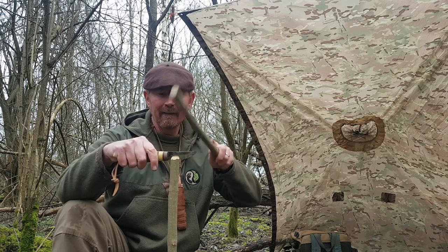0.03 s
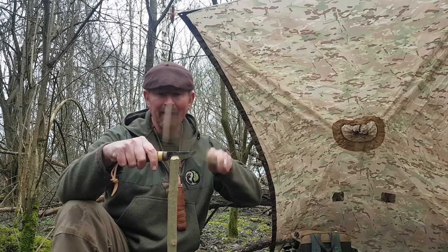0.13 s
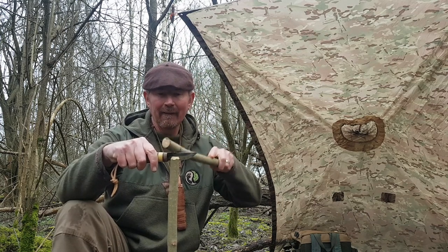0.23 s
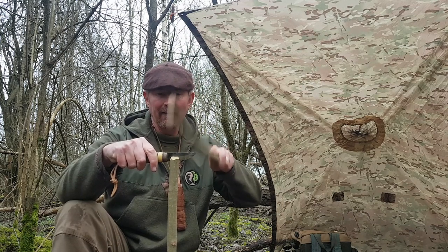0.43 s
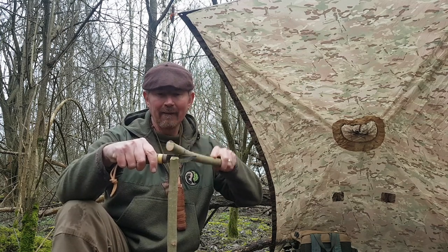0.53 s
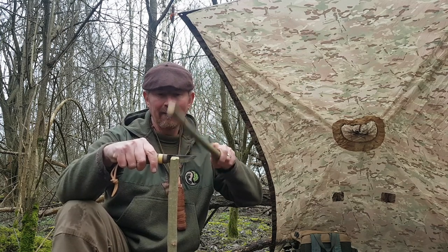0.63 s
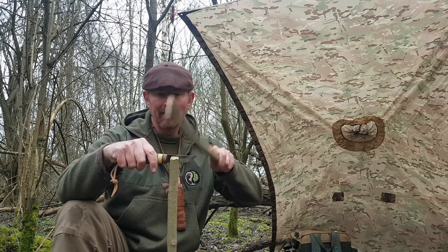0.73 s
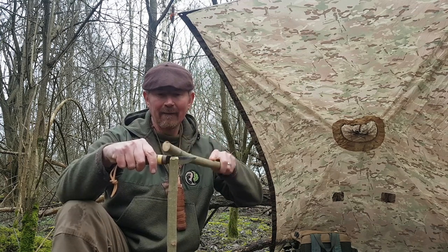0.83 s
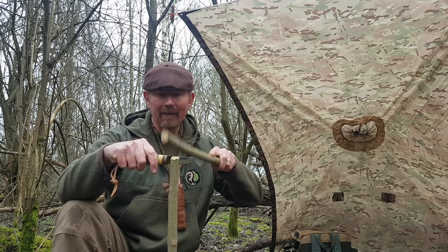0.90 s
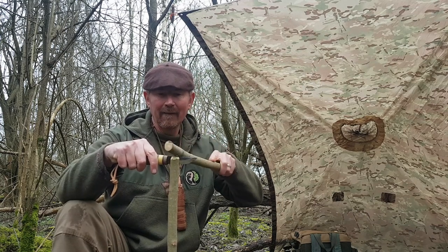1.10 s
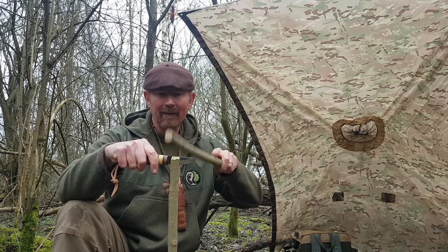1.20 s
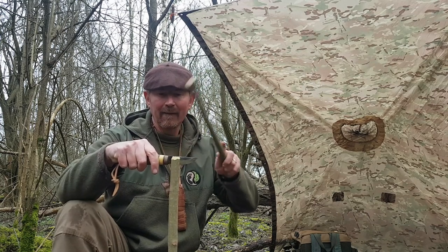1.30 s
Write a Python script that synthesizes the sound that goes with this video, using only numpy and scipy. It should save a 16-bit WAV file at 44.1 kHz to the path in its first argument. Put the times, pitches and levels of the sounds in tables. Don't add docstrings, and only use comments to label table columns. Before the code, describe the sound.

A wooden baton strikes a knife blade into a stake at about 0.2, 0.5, 0.8 and 1.15 seconds. Each blow is a light touch instantly followed by a hard, short wood-and-steel crack, with a low soil thump and brief woodland reflections. The first is brightest, the third loudest and duller. Cloth and twigs tick near 0.1 and 0.9; faint birds whistle near 0.4, 0.6 and 1.3 over distant traffic hum and hiss.

```python
import sys
import numpy as np
from scipy import signal
from scipy.io import wavfile
from scipy.ndimage import uniform_filter1d

SR = 44100
rng = np.random.default_rng(int(sys.argv[2]) if len(sys.argv) > 2 else 0)


def waveform_to_disk(signal):
    frames = np.transpose(np.atleast_2d(signal))
    scaled = np.clip(frames, -1, 1) * 32767
    samples = np.round(scaled).astype(np.int16)
    wavfile.write(sys.argv[1], SR, samples)


def boost_factor(decibels):
    exponent = np.asarray(decibels, float) / 20
    return 10 ** exponent


N = 59535
CONTACT_S = 0.0004


def evened(x):
    return x / np.sqrt(np.mean(x ** 2) + 1e-20)


def read(points, hz):
    f, value = np.transpose(points)
    return np.interp(np.log(hz + 1), np.log(f + 1), value)


def add(mix, start_s, sound):
    part = mix[:, round(start_s * SR):][:, :sound.shape[1]]
    part += sound[:, :part.shape[1]]


def coloured(x, points):
    hz = abs(np.fft.fftfreq(4096, 1 / SR))
    log_gain = np.log(boost_factor(read(points, hz)))
    minimum_phase = np.exp(np.conj(signal.hilbert(log_gain)))
    taps = np.fft.ifft(minimum_phase).real[:2048]
    return signal.fftconvolve(x, taps[None], axes=1)[:, :x.shape[1]]


def pair(x, right_db):
    lag = 4
    late = np.r_[np.zeros(lag), x[:-lag]]
    return np.array([x, boost_factor(right_db) * late])


# pitch_hz, level_db (per Hz)
HUM_COLOUR = [(22, -38), (45, -33.5), (85, 2), (360, -16), (800, -12.5), (1400, -25), (3000, -34),
              (7500, -56)]
# pitch_hz, likeness (-1 to 1)
HUM_LIKENESS = [(60, .98), (180, .94), (400, .7), (700, .1), (1400, -.22), (3000, .01)]
# pitch_hz, left_minus_right_db
HUM_LEAN = [(60, -0.5), (180, -0.5), (550, 1.5), (1650, 4.5), (4970, 5.5), (15000, 0.5)]


def hum():
    hum_db, patch_db, air_edge_hz = -45, 0.98, 15800
    frames, hz = N // 256 + 5, np.fft.rfftfreq(1024, 1 / SR)
    a, b, c, d, patches = rng.standard_normal((frames, 513, 5)).T
    patches = uniform_filter1d(patches, 10, 0)
    patches = evened(uniform_filter1d(patches, 12, 1))
    same = np.clip(read(HUM_LIKENESS, hz), -1, 1)[:, None]
    left = a + 1j * b
    right = same * left + np.sqrt(1 - same ** 2) * (c + 1j * d)
    half_lean_db = read(HUM_LEAN, hz)[:, None] / 2
    level_db = read(HUM_COLOUR, hz)[:, None] + patch_db * patches
    z = np.array([left, right]) * boost_factor(level_db + np.array([half_lean_db, -half_lean_db]))
    z *= (hz < air_edge_hz)[:, None]
    sound = signal.istft(z, nperseg=1024, noverlap=768)[1][:, :N]
    return boost_factor(hum_db) * evened(sound)


# time_s, pitch_hz, level_db
BIRD_CALLS = [
    [(.39, 3500, -71), (.43, 3900, -68), (.46, 4150, -69), (.49, 3880, -71), (.515, 3750, -75)],
    [(.58, 4280, -82), (.68, 4480, -77), (.80, 4420, -83)],
    [(1.24, 3720, -75), (1.30, 3740, -70), (1.40, 3720, -71)],
]


def birds():
    flutter_db, fade_s = 1.2, 0.013
    out, t = np.zeros(N), np.arange(N) / SR
    for time_s, pitch_hz, level_db in map(np.transpose, BIRD_CALLS):
        fade = np.clip(np.minimum(t - time_s[0], time_s[-1] - t) / fade_s, 0, 1)
        flutter = evened(uniform_filter1d(rng.standard_normal(N), 500))
        level = fade * boost_factor(np.interp(t, time_s, level_db) + flutter_db * flutter)
        glide_hz = uniform_filter1d(np.interp(t, time_s, pitch_hz), size=900)
        out += level * np.sin(2 * np.pi * np.cumsum(glide_hz) / SR)
    return 2 * out


# start_s, level_db, pitch_hz (centre), t60_s (time to die by 60 dB), left_minus_right_db
TICK_EVENTS = [(.086, -38, 4810, 0.0355, 9.5), (0.088, -47, 2620, 0.042, 5),
               (0.094, -44.5, 5240, 0.028, 25), (0.087, -67, 12800, 0.079, 6), (.468, -65, 14300, .015, 25),
               (.905, -48, 6000, 0.023, 17.5), (.905, -52, 12900, 0.012, 12),
               (0.9247, -41.5, 5300, 0.02, 16), (0.9225, -47.5, 2900, .02, 3),
               (0.922, -42, 13900, 0.023, 15), (1.008, -59.5, 6000, .015, 14)]


def ticks():
    width = 0.22
    out, t = np.zeros((2, N)), np.arange(2500) / SR
    for start_s, level_db, pitch_hz, t60_s, lean_db in TICK_EVENTS:
        edges = np.clip([pitch_hz * (1 - width), pitch_hz * (1 + width)], 100, 20000)
        band_filter = signal.butter(2, edges, "band", fs=SR)
        band = signal.lfilter(*band_filter, rng.standard_normal(len(t)))
        add(out, start_s, pair(evened(band) * boost_factor(level_db - 60 * t / t60_s), -lean_db))
    return out


# pitch_hz, t60_s
TRUNK_DECAY = [(100, 0.1), (1000, .4), (3000, 0.49), (6000, 0.36), (9000, 0.085), (15000, 0.1)]


def trunks(x):
    taps = np.zeros((2, 30000))
    at = np.arange(400, 29980, 20) + rng.integers(0, 20, (2, 1479))
    np.put_along_axis(taps, at, rng.choice([-1., 1.], at.shape), 1)
    hz, t, z = signal.stft(taps, SR, nperseg=256)
    decay = boost_factor(-60 * t / read(TRUNK_DECAY, hz)[:, None])
    tail = signal.istft(z * decay, SR, nperseg=256)[1]
    return signal.fftconvolve(x[None], tail / np.linalg.norm(tail[0]), axes=1)[:, :N]


# delay_s, left_db, right_db
NEAR_ECHOES = [(.0045, -17, -11), (.0100, -16.5, -25), (0.0166, -30.5, -26), (0.022, -32, -31.5)]


def echoes(wood):
    spread_s = 0.006
    out, size = np.zeros((2, N)), round(spread_s * SR)
    heard = np.array([wood[0], wood.mean(0)])
    for delay_s, left_db, right_db in NEAR_ECHOES:
        smear = rng.standard_normal((2, size)) * np.hanning(size)
        smear *= boost_factor([[left_db], [right_db]]) / np.linalg.norm(smear, axis=1, keepdims=True)
        add(out, delay_s, signal.fftconvolve(heard, smear, axes=1))
    return out


def ground(push_db, thump_db):
    push_hz, push_t60_s = 240.6, 0.012
    thump_hz, thump_sag, thump_rise_s, thump_after_s = 83.6, 0.44, 0.0085, 0.0016
    right_lag = 10
    t = np.arange(5000) / SR
    push = -boost_factor(push_db - 60 * t / push_t60_s) * np.sin(2 * np.pi * push_hz * t)
    u = np.maximum(t - thump_after_s, 0) / thump_rise_s
    pitch_hz = thump_hz * (1 + thump_sag * np.exp(-u)) * (u > 0)
    turns = np.cumsum(pitch_hz) / SR
    thump = boost_factor(thump_db) * u * np.exp(1 - u) * np.sin(2 * np.pi * turns)
    swing = push + thump
    return np.array([swing, np.roll(swing, right_lag)])


# pitch_hz, level_db
CRACK_COLOUR = [(300, -12), (1500, -21), (6000, -3), (7700, -7.5), (9000, -12), (11500, -5.5), (14500, -4),
                (16800, -15.5)]


def snap(level_db, air_db):
    crack_db, crack_t60_s, crack_right_db = -2, 0.006, -23
    sizzle_db, sizzle_t60_s, sizzle_right_db = -44.5, 0.36, -17
    ring_hz, ring_t60_s, ring_db, ring_right_db = 6075, 0.0072, 2.5, -38.5
    t = np.arange(9000) / SR
    noise = rng.standard_normal((3, len(t)))
    crack = pair(noise[0] * boost_factor(crack_db - 60 * t / crack_t60_s), crack_right_db)
    sizzle = noise[1:] * boost_factor(sizzle_db - 60 * t / sizzle_t60_s) * boost_factor([[0], [sizzle_right_db]])
    air = boost_factor(air_db) * coloured(crack + sizzle, CRACK_COLOUR)
    ring = boost_factor(ring_db - 60 * t / ring_t60_s) * np.sin(2 * np.pi * ring_hz * t)
    ring *= 1 - np.exp(-t / CONTACT_S)
    return boost_factor(level_db) * (air + pair(ring, ring_right_db))


# pitch_hz, level_db, t60_s, left_minus_right_db, touch_db (change when only touched)
RING_MODES = [(515, -15, .018, 0, -3.2), (927, -4, 0.012, 5, -8.5), (1214, -9.5, 0.018, 6, 11.7),
              (1500, -21.5, 0.01, 22, 17), (1738, -6.5, 0.014, 33.5, -5.5), (1993, 3, 0.017, 7.5, 0),
              (2407, -14, 0.022, 12.5, -20.7), (2879, 1.5, 0.01, 2, -7.5), (3128, 0, 0.033, 15, -1),
              (3443, -10.5, 0.03, 4.5, -28), (3874, -5.5, 0.019, 5.5, -13.7), (4213, -2, 0.015, 38.5, 5),
              (5380, -1.5, 0.0073, 15.5, -10.5), (7530, -15.5, 0.0072, 14.5, 13)]
SHADE_PITCHES = [600, 1200, 2000, 3100, 5300]


def contact(level_db, bright_db, touch, shade):
    bright_hz, detune = 4000, 0.002
    touch_damping = 2.5
    chatter_s, chatter_db = 0.003, -27
    t = np.arange(7000) / SR
    luck = rng.standard_normal((len(RING_MODES), 2))
    noise = rng.standard_normal(len(t))
    shade_table = np.c_[SHADE_PITCHES, shade]
    ring = np.zeros((2, len(t)))
    for (pitch_hz, mode_db, t60_s, lean_db, touch_db), (side, drift) in zip(RING_MODES, luck):
        mode_db = mode_db + touch * touch_db + read(shade_table, pitch_hz)
        mode_db += bright_db * np.log2(pitch_hz / bright_hz + 1)
        decay = boost_factor(mode_db - 60 * t / t60_s * touch_damping ** touch)
        wave = np.sin(2 * np.pi * pitch_hz * (1 + detune * drift) * t) * np.sign(side)
        ring += pair(decay * wave, -lean_db)
    ring *= 1 - np.exp(-t / CONTACT_S)
    click = t == 0
    chatter = boost_factor(chatter_db) * noise * np.clip(2 - 2 * t / chatter_s, 0, 1) + click
    return boost_factor(level_db - 6) * signal.fftconvolve(ring, chatter[None], axes=1)[:, :len(t)]


# start_s (touch), touch_db, knock_after_s, knock_db, brightness_db
BLOW_EVENTS = [
    (0.2129, -10, 0.0018, -12.5, 6.5),
    (0.519, -15.5, .0030, -7.5, 4),
    (.8300, -10.5, .0024, -4, -2),
    (1.1486, -25, 0.0029, -10.5, 0),
]
# push_db, thump_db
GROUND_LEVELS = [(-19, -24), (-18.5, -27.5), (-20.5, -24.5), (-12, -24)]
BLOW_SHADES = [(3, 4.5, -1.4, 1.6, 1), (3.5, 0.7, 0.14, -2.3, -0.5), (-3.5, 1, 0.83, -0.86, 2),
               (5.3, 0, -2.5, -0.039, 8.5)]
SNAP_DELAYS = [.0006, .0015, .0002, .0003]
SNAP_LEVELS = [-4, -10.5, -18, -17]
SNAP_AIR = [-3.5, 3.5, 1, 4]


def blows():
    wood, low = np.zeros((2, N)), np.zeros((2, N))
    snaps = zip(SNAP_DELAYS, SNAP_LEVELS, SNAP_AIR)
    for blow, soil, shade, crackle in zip(BLOW_EVENTS, GROUND_LEVELS, BLOW_SHADES, snaps):
        start_s, touch_db, knock_after_s, knock_db, bright_db = blow
        snap_after_s, snap_db, air_db = crackle
        add(wood, start_s, contact(touch_db, bright_db, 0.76, shade))
        add(wood, start_s + knock_after_s, contact(knock_db, bright_db, 0, shade))
        add(wood, start_s + snap_after_s, snap(snap_db, air_db))
        add(low, start_s, ground(*soil))
    return wood, low


def scene():
    trunks_db, trunks_right_db = -30, -9.5
    bird_right_db, bird_wet_db = -7, -8
    wood, low = blows()
    song = birds()
    near = wood + low + ticks() + hum() + echoes(wood)
    into_trunks = boost_factor(trunks_db) * wood[0] + boost_factor(bird_wet_db) * song
    far = trunks(into_trunks) * boost_factor([[0], [trunks_right_db]])
    return near + far + pair(song, bird_right_db)


def low_pass(x):
    return signal.sosfilt(signal.butter(12, 17110, fs=SR, output="sos"), x)


# pitch_hz, level_db
PORT_COLOUR = [(400, -2.57), (4000, 1.18), (6200, 4.5), (7500, 1.5), (9000, 0.5), (11000, 4), (14000, 8.5),
               (16000, 2)]
# pitch_hz, level_db (per Hz)
HISS_COLOUR = [(2000, 4.5), (7000, -0.5), (9000, -9.5), (12000, -7.9), (15600, 4.8), (15850, -55)]


def record(dry):
    hiss_db, low_cut_hz, edge_hz, ceiling = -76, 39, 17000, 1
    hiss = boost_factor(hiss_db) * evened(coloured(rng.standard_normal((2, N)), HISS_COLOUR))
    low_cut = signal.butter(2, low_cut_hz, "high", fs=SR)
    x = signal.lfilter(*low_cut, coloured(dry, PORT_COLOUR)) + hiss
    x = ceiling * np.tanh(x / ceiling)
    edge = signal.firwin(255, edge_hz, window=("kaiser", 9), fs=SR)
    mix = signal.oaconvolve(x, edge[None], "same")
    return low_pass(mix)


dry = scene()
out = record(dry)
waveform_to_disk(out)
```